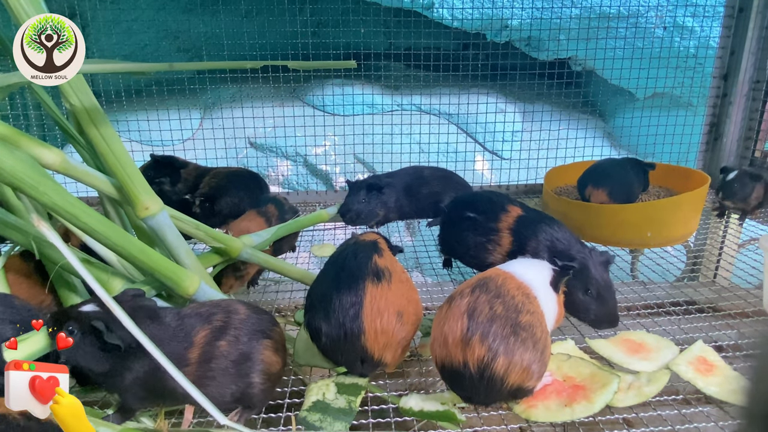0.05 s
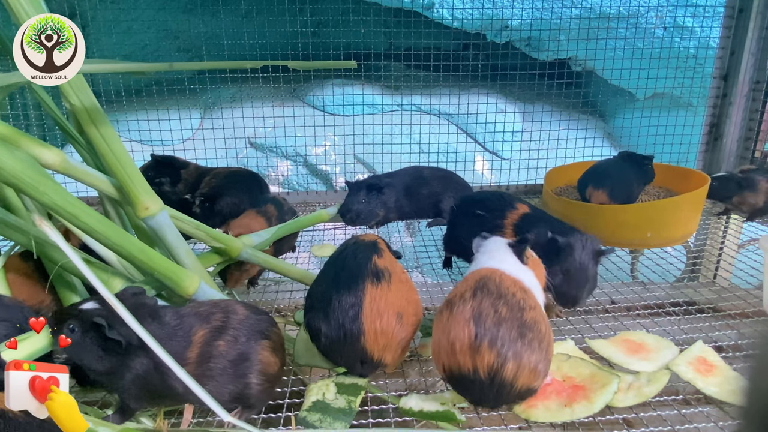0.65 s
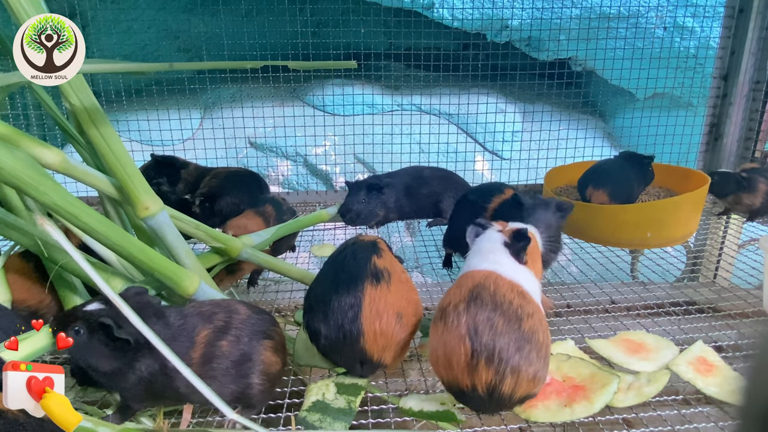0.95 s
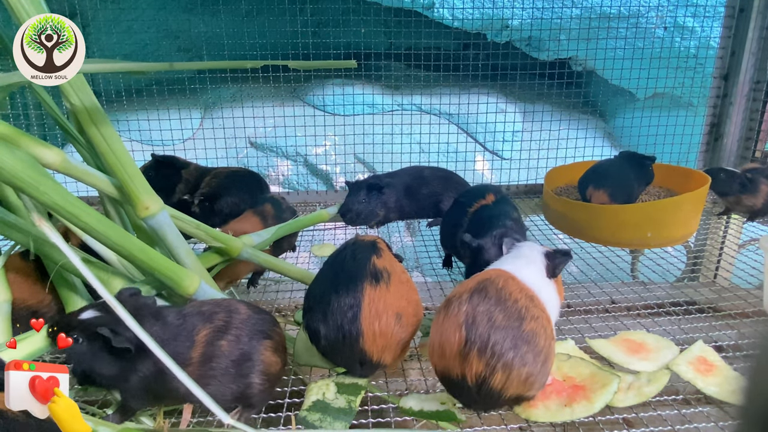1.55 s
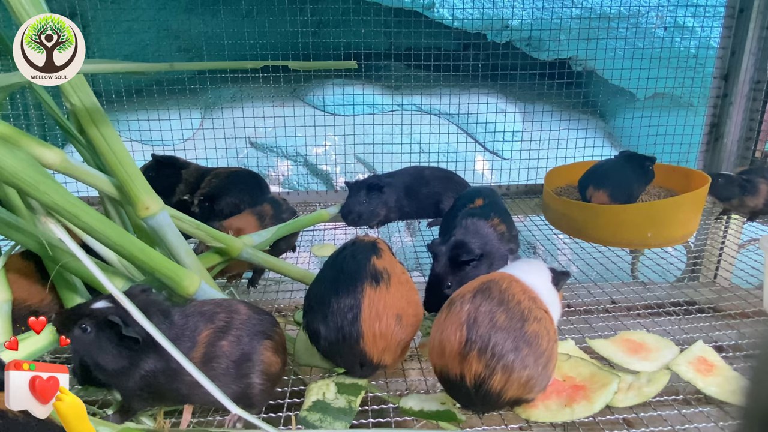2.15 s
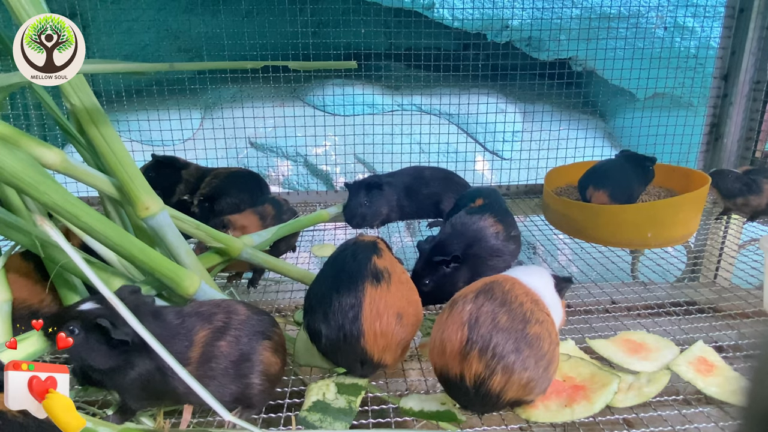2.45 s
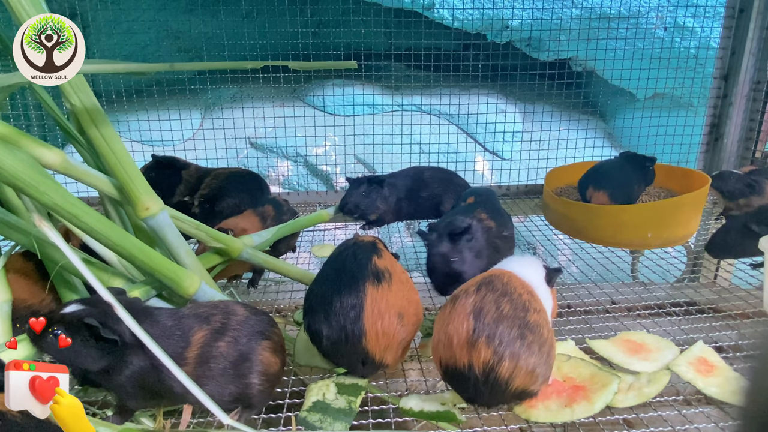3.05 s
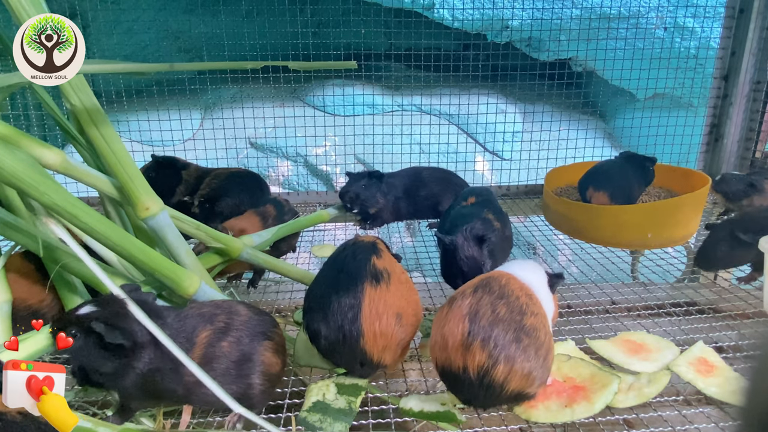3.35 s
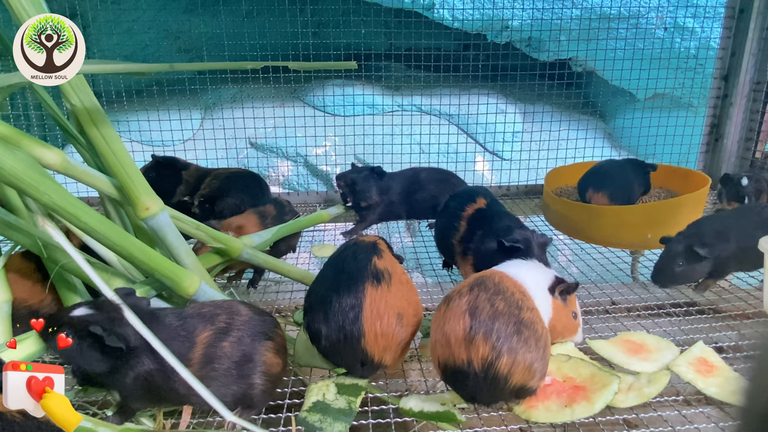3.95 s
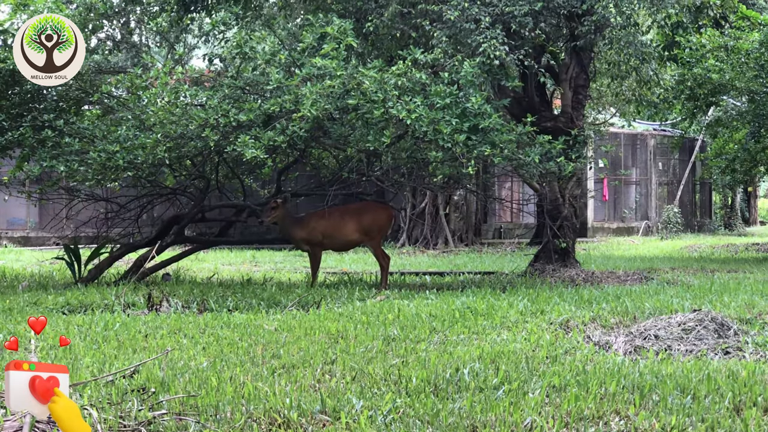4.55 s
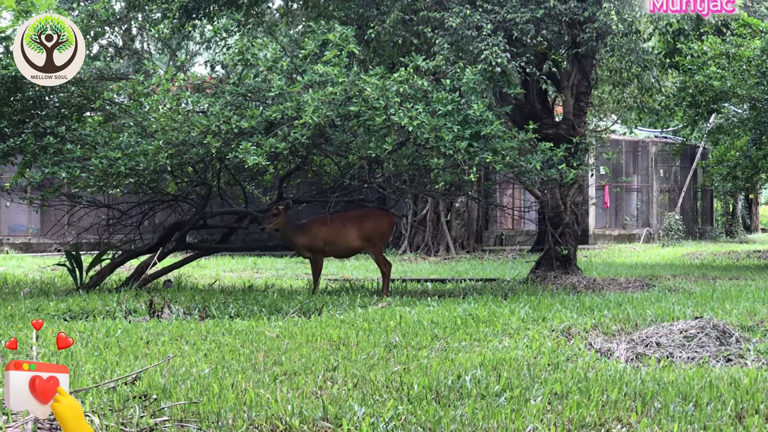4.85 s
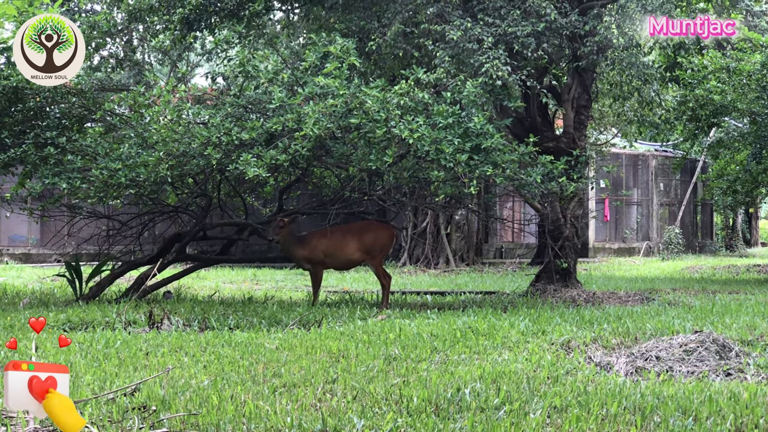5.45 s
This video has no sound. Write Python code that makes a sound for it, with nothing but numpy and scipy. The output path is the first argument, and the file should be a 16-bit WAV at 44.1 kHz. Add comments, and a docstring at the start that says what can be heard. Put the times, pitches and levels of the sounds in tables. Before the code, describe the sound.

Overlapping, rising guinea pig squeals fill a cage, followed by a faint open-air hiss with dry ticks and one brush of foliage.

```python
"""Guinea pigs beg for food in a wire cage, close by: overlapping calls start as a low whine near 500 Hz
and whip up into a whistle as the vocal folds tighten. Air rasps in their throats; feet scuffle in leaves.
Then the scene changes to an open lawn: a soft hiss, the crackle of dry blades and snapping stalks,
and one brushing rustle of foliage."""
import sys
import numpy as np
from scipy import signal
from scipy.fft import rfft, irfft
from scipy.io import wavfile
from scipy.ndimage import uniform_filter1d, map_coordinates

SR = 44100
rng = np.random.default_rng(int(sys.argv[2]) if len(sys.argv) > 2 else 0)


def wrap_up_sound(samples):
    """Save the sound to the file named by the first command line argument, as 16-bit audio."""
    columns = np.atleast_2d(samples).T
    # keep every value between -1 and 1, then stretch to whole-number steps
    tamed = np.clip(columns, -1, 1)
    steps = np.round(tamed * 32767).astype(np.int16)
    wavfile.write(sys.argv[1], SR, steps)


N = 251370
TIME = np.arange(N) / SR
LAWN_START_S, TOP_HZ = 4.335, 15750


def undb(db):
    """Decibels to gain."""
    return 10 ** (np.asarray(db) / 20)


def colour_db(spectrum, hz):
    """Level of a spectrum of (Hz, dB) points, read on a log-frequency axis."""
    points_hz, db = np.transpose(spectrum)
    return np.interp(np.log(np.maximum(hz, 1)), np.log(points_hz), db)


def shape(x, spectrum):
    """Colours a sound; rms 1."""
    y = irfft(rfft(x) * undb(colour_db(spectrum, np.fft.rfftfreq(N, 1 / SR))), N)
    return y / y.std()


def noise(spectrum):
    """Coloured noise; rms 1."""
    return shape(rng.standard_normal(N), spectrum)


def walk(rate_hz, size):
    """Smooth random drift, spread near 1."""
    steps = np.arange(size) * rate_hz / SR
    return map_coordinates(rng.standard_normal(size // 10 + 2), [steps], order=2, mode="wrap")


def swells(events):
    """Gain of bursts that rise and fall exponentially."""
    return sum(undb(db) * np.exp(-np.maximum((peak_s - TIME) / rise_s, (TIME - peak_s) / fall_s))
               for peak_s, db, rise_s, fall_s in events)


def smooth_curve(t, times, values):
    """Cubic curve through the points, without overshoot."""
    slope = np.diff(values) / np.diff(times)
    before, after = slope[:-1], slope[1:]
    inner = 2 * np.maximum(before * after, 0) / np.where(before * after > 0, before + after, 1)
    tangent = np.r_[slope[0], inner, slope[-1]]
    i = np.clip(np.searchsorted(times, t) - 1, 0, len(times) - 2)
    u = (t - times[i]) / (times[i + 1] - times[i])
    bend = (tangent[i] - slope[i]) * (1 - u) - (tangent[i + 1] - slope[i]) * u
    return values[i] + (t - times[i]) * (slope[i] + (1 - u) * bend)


# Calls that swing from a whine to an end pitch. Each row: start and length in seconds, whine and end
# pitch in Hz, swing midpoint and swing time in seconds, sharp onset as a share of pitch, attack in
# seconds, source level in dB at whine, mid swing and end, second and upper harmonics in dB relative to
# that level in the whine, the same two at the end.
WHEEK_CALLS = [(0.0, 0.14, 530, 3080, 0.077, 0.024, 0.079, 0.00067, -44.5, -45, -45, -2.5, -12, -4, 2),
               (0.118, 0.2, 480.3, 1990, 0.11, 0.045, 0.41, 0.011, -39.5, -36.5, -46.5, -7.5, -12, -18, -15),
               (0.243, 0.19, 502.3, 3620, 0.1, 0.03, 0.29, 0.01, -42.5, -41, -46, -2, -9, -4.5, -10),
               (0.432, 0.16, 558.4, 448.3, 0.081, 0.0044, 0.07, 0.02, -48, -45.5, -57, -2, -6, -5, 7),
               (0.435, 0.129, 466.4, 1350, 0.061, 0.0256, 0.3, 0.0012, -41, -42.5, -41.5, 0.5, -7.5, -20, -26),
               (0.562, 0.15, 546.6, 1495, 0.033, 0.027, 0.116, 0.0069, -42, -37.5, -38.5, 5.5, -8, -13, -22),
               (0.597, 0.16, 493.3, 3190, 0.099, 0.025, 0.24, 0.0052, -44.5, -39, -34.5, 0.5, 0, -3.5, -14.5),
               (0.672, 0.16, 478.2, 2780, 0.099, 0.041, 0.03, 0.0056, -51.5, -43.5, -35, -4, 14, -26, -31),
               (0.883, 0.14, 488, 2515, 0.11, 0.039, 0.27, 0.04, -50, -34, -57, 4, 1.5, -17, 0),
               (0.985, 0.12, 575, 3335, 0.014, 0.048, 0.018, 0.018, -38.5, -44.5, -36, 16, -4, -13, -13),
               (0.994, 0.14, 450.6, 957, 0.1, 0.041, 0.018, 0.03, -40.5, -38.5, -36, 2, 3, -3.5, -21),
               (1.521, 0.18, 531, 3020, 0.1, 0.023, 0.25, 0.0098, -47.5, -37.5, -43.5, -0.5, -4, -1, -3),
               (1.624, 0.17, 382, 2540, 0.097, 0.051, 0.21, 0.0078, -50, -52, -35, -5, -2, -2, -7),
               (1.844, 0.18, 527, 3003, 0.098, 0.023, 0.31, 0.0028, -45.5, -36, -38.5, 0, -1.5, -3.5, -7.5),
               (2.082, 0.084, 553, 716, 0.063, 0.031, 0.099, 0.0086, -36.5, -39.5, -51, -6.5, -17.5, 1, -6),
               (2.154, 0.093, 468, 1590, 0.07, 0.034, 0.16, 0.004, -54.5, -35.5, -38.5, 2, 8, -9, -15),
               (2.302, 0.2, 342, 2815, 0.074, 0.11, 0.36, 0.004, -48.5, -56, -40.5, -9, -16, -2, -7),
               (2.468, 0.14, 471, 1640, 0.099, 0.027, 0.33, 0.0026, -53, -35.5, -51, 8, 1, -29.5, -8),
               (2.607, 0.16, 541, 1213, 0.086, 0.035, 0.2, 0.017, -35, -51, -42, -3.5, -12.5, 7, -9),
               (2.906, 0.11, 992, 1020, 0.017, 0.026, 0.0056, 0.02, -41, -54, -65, -13, -12, -5, -11.5),
               (2.983, 0.17, 480, 3650, 0.096, 0.047, 0.18, 0.028, -32, -31.5, -35.5, -3.5, -11, -24, -28),
               (3.05, 0.13, 465, 590, 0.06, 0.02, 0.33, 0.033, -48.5, -39, -47, -14, 10, 2, 10),
               (3.144, 0.096, 816.5, 1185, 0.073, 0.0095, 0.28, 0.011, -39.5, -36.5, -59, 4, 3.5, 27.5, 4.5),
               (3.295, 0.21, 484, 3700, 0.106, 0.045, 0.2, 0.016, -46.5, -31, -34.5, 3, -5, -16.5, -17.5),
               (3.364, 0.174, 516, 2549, 0.094, 0.043, 0.33, 0.007, -26, -33.5, -26, -9, -18.5, -4.5, -20.5),
               (3.439, 0.11, 524, 1165, 0.0011, 0.1, 0.064, 0.0012, -45, -36.5, -72.5, 12.5, 8, -1, -2.5),
               (3.616, 0.096, 505.2, 522.4, 0.059, 0.023, 0.0, 0.034, -46.5, -44, -28.5, 3, -4.5, -8, -10),
               (3.772, 0.085, 479.4, 1562, 0.06, 0.026, 0.012, 0.038, -46, -39.5, -31, 15, -3, -3.5, -19),
               (3.982, 0.18, 453.6, 3800, 0.11, 0.038, 0.13, 0.0013, -51, -33.5, -31.5, 8.5, 5, -14, -10),
               (4.076, 0.25, 453, 2680, 0.087, 0.09, 0.47, 0.023, -31, -47.5, -31, 0, -4.5, -9.5, -22),
               (4.161, 0.07, 653, 979, 0.078, 0.054, 0.0, 0.0033, -59, -53, -36.5, 29.5, 14.5, -4, 7),
               (4.254, 0.07, 496.6, 580, 0.07, 0.01, 0.31, 0.013, -45, -39.5, -35, -4.5, 2.5, -9, 12)]


def wheeks(settle_s=0.012, release_s=0.0098, quaver_hz=38.2, quaver_share=0.012, quaver_db=3.5,
           waver_hz=140, waver_share=0.016, waver_db=1.6):
    """Yields each call: fold tension follows an S-curve and sets pitch, level, overtones and quaver."""
    for call in WHEEK_CALLS:
        start_s, length_s, whine_hz, end_hz, middle_s, swing_s, sharp_share, attack_s = call[:8]
        levels_db, whine_overtones_db, end_overtones_db = call[8:11], call[11:13], call[13:]
        t = TIME[int(start_s * SR):int((start_s + length_s) * SR)]
        age = t - t[0]
        pull = np.tanh((age - middle_s) / swing_s)
        tension = (pull - pull[0]) / (pull[-1] - pull[0])
        quaver = tension * np.sin(2 * np.pi * quaver_hz * age + walk(quaver_hz, len(t)))
        hz = whine_hz * (end_hz / whine_hz) ** tension
        hz *= 1 + sharp_share * np.exp(-age / settle_s) + quaver_share * quaver
        db = np.interp(tension, [0, .5, 1], levels_db) + quaver_db * quaver
        thin_second_db, thin_upper_db = thinning(hz)
        unsteady = 4 * tension * (1 - tension)  # greatest in mid swing
        hz *= 1 + waver_share * unsteady * walk(waver_hz, len(t))
        db += waver_db * unsteady * walk(waver_hz, len(t))
        flare_db, shine_db = flares(t, hz)
        second_db, upper_db = (db + np.interp(tension, [0, 1], ends)
                               for ends in zip(whine_overtones_db, end_overtones_db))
        second_db += thin_second_db + shine_db / 2
        upper_db += thin_upper_db + shine_db
        gate = np.minimum(age / attack_s, 1) * np.minimum((t[-1] - t) / release_s, 1)
        yield voice(t, hz, (db + flare_db, second_db, upper_db), gate)


# Throat and mouth resonances. Each row: frequency in Hz, gain in dB.
THROAT_RESPONSE = [(2400, 1), (3300, -10.5), (3700, -15.5), (4100, -23.5), (5400, -20), (7000, -14.5),
                   (8300, -20.5), (10500, -22), (15000, -34.5)]


def voice(t, hz, levels_db, gate, jitter=0.008, rattle=0.011, flutter_db=1.7, hoarse=0.045,
          whistle_hz=1500, rolloff_db_per_octave=10.5):
    """The folds' harmonics slide through fixed throat resonances. Returns tone and rasp envelope."""
    slack = 1 / (1 + (hz / whistle_hz) ** 2)  # slack folds beat unevenly, tight ones whistle
    hz = hz * (1 + np.sqrt(slack) * jitter * walk(130, len(t)) + slack * rattle * walk(900, len(t)))
    phase = 2 * np.pi * np.cumsum(hz) / SR
    first_db, second_db, upper_db = levels_db
    uppers_db = [upper_db - rolloff_db_per_octave * np.log2(k / 3) for k in range(3, 17)]
    tone, power = 0, 0
    for k, db in enumerate([first_db, second_db] + uppers_db, 1):
        harmonic_db = db + colour_db(THROAT_RESPONSE, k * hz) + flutter_db * walk(150, len(t))
        gain = gate * undb(harmonic_db) * (k * hz < TOP_HZ)
        roughness = 1 + min(hoarse * k ** 1.5, .7) * walk(1100, len(t))
        tone += gain * np.sin(k * phase) * roughness
        power += gain ** 2
    start = round(t[0] * SR)
    return np.pad([tone, np.sqrt(power) * slack], ((0, 0), (start, N - start - len(t))))


# Air rushing through the throat. Each row: frequency in Hz, level in dB.
RASP_SPECTRUM = [(180, -12), (320, 2), (600, 15), (2900, 10.5), (4000, -35), (7200, -37), (15000, -24.5)]
# Raspy grunts. Each row: peak in seconds, added rasp in dB re the usual rasp, rise and fall in seconds.
GRUNT_SWELLS = [(.47, 6, .01, 0.035), (1.35, -9, .02, 0.028), (2.68, 14.5, 0.013, 0.077),
                (3.06, 12, .012, 0.023), (3.15, 8, .02, 0.017), (3.42, 3.5, 0.035, 0.014),
                (3.69, -1, .012, 0.029), (3.83, 3, .02, 0.013)]


def rasp(envelope, level_db=-24.5):
    """Throat air follows the voices and swells where they break into a grunt."""
    return undb(level_db) * (1 + swells(GRUNT_SWELLS)) * envelope * noise(RASP_SPECTRUM)


def thinning(hz, second_db=-3, upper_db=-9, fast_octaves_per_s=26):
    """Second and upper harmonics weaken in a fast upward slide; both changes in dB."""
    octaves_per_s = uniform_filter1d(np.gradient(np.log2(hz)) * SR, size=700)
    return np.outer([second_db, upper_db], np.clip(octaves_per_s / fast_octaves_per_s, 0, 1))


# Whistle flares. Each row: centre and half length in seconds, gain in dB of the fundamental and of the
# upper harmonics at full whistle.
WHISTLE_FLARES = [(0.109, .005, 13.5, 10), (0.123, 0.0087, 15, 1), (0.389, 0.0064, 20.5, 22),
                  (.406, 0.01, 11, 12), (0.737, 0.011, 12, -7), (1.068, 0.017, 9.5, 4),
                  (1.668, 0.022, 16, -10), (1.973, 0.0063, 9, 11), (1.995, 0.011, 11, -24),
                  (3.149, 0.032, -5, 33), (3.467, 0.023, -5.5, 22.5), (4.131, 0.0041, 19.5, 12.5),
                  (4.306, 0.0081, 5.5, 0)]


def flares(t, hz, onset_hz=1940, full_hz=2650):
    """A voice high enough to whistle flares for an instant; fundamental and upper gains in dB."""
    centre_s, half_s, *gains_db = np.transpose(WHISTLE_FLARES)
    bumps = np.exp(-((t - centre_s[:, None]) / half_s[:, None]) ** 2)
    return np.array(gains_db) @ bumps * np.interp(hz, [onset_hz, full_hz], [0, 1])


def crackle(spectrum, clicks_per_s, spread_db):
    """Leaves rub: dense tiny clicks, a few much larger than the rest; rms 1."""
    sizes = undb(spread_db * np.minimum(rng.exponential(size=N), 4))
    clicks = rng.standard_normal(N) * sizes * (rng.random(N) < clicks_per_s / SR)
    return shape(clicks, spectrum)


# Leaves in the cage. Each row: frequency in Hz, level in dB.
SCUFFLE_SPECTRUM = [(600, -5), (3400, 6), (4400, 0.5), (7300, 1.5), (10000, -10), (15000, -21.5)]
# Pushes of the feet. Each row: peak in seconds, level in dB, rise and fall in seconds.
SCUFFLE_SWELLS = [(.73, -65, 0.069, 0.083), (1.11, -58.5, 0.12, 0.061), (1.46, -49, 0.034, 0.027),
                  (1.635, -46, 0.0067, 0.056), (1.89, -56, 0.039, 0.019), (2.89, -60.5, 0.083, 0.029),
                  (3.6, -63.5, 0.0034, 0.0079)]


def scuffle(nibble_db=-74):
    """Feet push through leaves over faint, steady nibbling."""
    envelope = undb(nibble_db) + swells(SCUFFLE_SWELLS)
    return envelope * crackle(SCUFFLE_SPECTRUM, clicks_per_s=6000, spread_db=3)


# Drawn-out squeals, one curve each. Each row of a curve: time in seconds, pitch in Hz, source level in dB
# of the fundamental, the second harmonic and the upper harmonics.
SQUEAL_CURVES = [
    [(1.164, 660, -43.5, -40, -57.5), (1.197, 511, -36.5, -42.5, -47), (1.275, 793.5, -45, -43.5, -58.5),
     (1.297, 1250, -26.5, -46, -44), (1.341, 828, -43, -43, -35.5), (1.391, 826, -44, -46.5, -38.5),
     (1.418, 950, -34.5, -60.5, -42.5), (1.437, 1377, -46, -71, -63.5)],
    [(1.248, 494, -46, -60, -47), (1.274, 474, -43, -39, -55), (1.297, 867, -40, -57, -52),
     (1.323, 1261, -43, -37, -37), (1.338, 1956, -27, -62, -42), (1.35, 2200, -21, -19, -24),
     (1.362, 2346, -31.5, -19.5, -36), (1.38, 2990, -10.5, -8, -20), (1.399, 3203, -9, -4.5, -23.5),
     (1.422, 3327, -11, -2.5, -24), (1.453, 3488, -11, -19, -39), (1.468, 3490, -16.5, -43, -38)],
    [(1.71, 566.6, -38.5, -55, -75), (1.733, 536.4, -40.5, -40.5, -49), (1.817, 1315, -36, -45, -48),
     (1.845, 2136, -38.5, -42, -58), (1.897, 1635, -38, -43, -41), (1.94, 2170, -36, -42, -55)],
    [(2.028, 434, -49, -68, -65), (2.127, 605.5, -55, -44.5, -54), (2.175, 1118, -32, -39, -51.5),
     (2.252, 1726, -40, -45, -57), (2.272, 2320, -32.5, -33, -45), (2.318, 2806, -25.5, -48, -41.5),
     (2.35, 3560, -29, -42, -43), (2.371, 3515, -9, -55, -28), (2.39, 3483, -21, -30, -31),
     (2.417, 3567, -9, -17.5, -39), (2.43, 3560, -51, -27, -43)],
    [(2.663, 588, -71, -41, -52), (2.682, 453.4, -44, -38, -47.5), (2.705, 688, -55, -39.5, -53),
     (2.76, 952, -46, -42, -43.5), (2.781, 1084, -45, -34, -49), (2.8, 960, -37.5, -33, -40),
     (2.816, 1055, -43.5, -34, -44), (2.838, 991, -38.5, -33, -35), (2.876, 1306, -80, -34, -66)],
    [(3.668, 693.4, -30, -32.5, -49), (3.686, 516, -33.5, -47, -54), (3.702, 520, -36.5, -46.5, -48),
     (3.752, 568.4, -32, -37, -46), (3.78, 707, -46.5, -36, -49), (3.798, 972, -36, -48, -57),
     (3.886, 2280, -34, -36.5, -61), (3.903, 2267, -26.5, -48, -55), (3.92, 2720, -33, -37, -45)],
]


def squeals(edge_s=0.0024):
    """Yields each long call, its pitch and strength wandering along a curve."""
    for curve in SQUEAL_CURVES:
        times, pitch_hz, *levels_db = np.transpose(curve)
        t = TIME[int(times[0] * SR):int(times[-1] * SR)]
        hz = np.exp(smooth_curve(t, times, np.log(pitch_hz)))
        gate = np.clip(np.minimum(t - t[0], t[-1] - t) / edge_s, 0, 1)
        yield voice(t, hz, [np.interp(t, times, db) for db in levels_db], gate)


def herd(low_cut_hz=330):
    """All calls with their rasp; nothing sounds below the low cut."""
    tone, rasp_envelope = sum(wheeks()) + sum(squeals())
    highpass = signal.butter(2, low_cut_hz, "high", fs=SR, output="sos")
    return signal.sosfilt(highpass, tone + rasp(rasp_envelope))


def enclosure(x, t60_s=0.26, tail_db=-21, bounce_db=-17, bounce_s=0.0028):
    """A bounce off a tarpaulin makes the glides waver; the enclosure adds a short, weak tail."""
    t = TIME[:SR // 2]
    response = rng.standard_normal(len(t)) * np.exp(-np.log(1000) * t / t60_s) * (t > bounce_s)
    tail = signal.fftconvolve(x, response / np.linalg.norm(response))[:N]
    bounce = np.roll(x, int(bounce_s * SR))
    return x + undb(bounce_db) * bounce + undb(tail_db) * tail


# Still air around the cage. Each row: frequency in Hz, level in dB.
CAGE_AIR_SPECTRUM = [(30, 0.5), (65, -7.5), (110, -19), (300, -7.5), (2500, -20.5), (5000, -35.5),
                     (15000, -28.5)]


def cage(air_db=-69, fade_out_s=0.027):
    """Calls and scuffling in the enclosure over still air, until the lawn starts."""
    sound = enclosure(herd() + scuffle()) + undb(air_db) * noise(CAGE_AIR_SPECTRUM)
    return sound * np.clip((LAWN_START_S - TIME) / fade_out_s, 0, 1)


# Air over the lawn. Each row: frequency in Hz, level in dB.
LAWN_AIR_SPECTRUM = [(15, -28), (25, 17), (848, -11.5), (1340, -2), (2230, -30), (2850, -4), (8130, -21),
                     (15500, -40)]


def lawn_air(level_db=-62):
    """A soft hiss of air; its level drifts by about 1 dB."""
    return undb(level_db + walk(16, N)) * noise(LAWN_AIR_SPECTRUM)


def ticks(events, decay_s, width_octaves):
    """Dry fibres break, each a burst of noise around its own pitch."""
    out, t = np.zeros(2 * N), TIME[:SR // 40]
    for start_s, peak_db, hz in events:
        edges_hz = np.minimum(hz * 2 ** (np.array([-1, 1]) * width_octaves / 2), TOP_HZ)
        crack = rng.standard_normal(len(t)) * np.exp(-t / decay_s)
        burst = signal.lfilter(*signal.butter(2, edges_hz, "band", fs=SR), crack)
        start = int(start_s * SR)
        out[start:start + len(t)] += undb(peak_db) * burst / np.abs(burst).max()
    return out[:N]


def blades(count=170, pitch_hz=3700, spread_octaves=0.3, spread_db=5):
    """Dry blades and leaves tick at random; rms 1 during the lawn scene."""
    when, size, pitch = rng.random((count, 3)).T
    start_s = LAWN_START_S + when * (TIME[-1] - LAWN_START_S)
    db = -spread_db * np.log(size + 0.019)
    hz = pitch_hz * 2 ** (spread_octaves * np.arcsin(2 * pitch - 1))
    ticking = ticks(zip(start_s, db, hz), decay_s=0.0015, width_octaves=1.1)
    return ticking / ticking[TIME > LAWN_START_S].std()


# Rubbing foliage. Each row: frequency in Hz, level in dB.
FOLIAGE_SPECTRUM = [(150, -5), (400, -1), (1150, -1), (2000, -2), (3100, 1.5), (5000, -2.5), (9000, -6.5),
                    (15000, -28.5)]
# Brushes against foliage. Each row: peak in seconds, relative level in dB, rise and fall in seconds.
BRUSH_SWELLS = [(4.55, -62, 0.074, 1), (4.876, -53.5, 0.0084, 0.0067), (5.16, -36, 0.027, 0.035),
                (5.3, -62, 0.1, 0.23)]


def foliage(rub_db=4, thud_db=-13):
    """Brushed leaves rub and tick; only a hard brush moves whole branches and adds a low thud."""
    push = swells(BRUSH_SWELLS)
    leaves = undb(rub_db) * crackle(FOLIAGE_SPECTRUM, clicks_per_s=8100, spread_db=5) + blades()
    thud = undb(thud_db) * noise([(90, -18), (170, 21), (600, -10), (2000, -55)])
    return push * leaves + push ** 2 / push.max() * thud


# Dry stalks. Each row: start in seconds, relative peak level in dB, pitch in Hz.
STALK_SNAPS = [(4.538, -42.5, 3920), (4.676, -40.5, 4210), (4.703, -34, 3460), (4.734, -39.5, 5000),
               (4.865, -40, 3360), (4.877, -30, 3480), (4.879, -42.5, 1050), (4.915, -43, 3700),
               (4.933, -39, 2830), (5.027, -35, 3460), (5.105, -42, 3350), (5.165, -27.5, 2900),
               (5.264, -36.5, 5860), (5.461, -40.5, 3200), (5.505, -52.5, 3780), (5.589, -46, 3000)]


def stalks(gain_db=8):
    """Larger stalks break with a wide, dry crack."""
    return undb(gain_db) * ticks(STALK_SNAPS, decay_s=0.0017, width_octaves=0.93)


def lawn(fade_in_s=0.17, sizzle_db=-67):
    """Foliage, air and stalks fade in; a thin treble sizzle starts at once."""
    fade_in = np.clip((TIME - LAWN_START_S) / fade_in_s, 0, 1)
    rustle = foliage() + lawn_air()
    sizzle = undb(sizzle_db) * noise([(2000, -25), (8800, -2), (10500, -18.5)])
    return (rustle + stalks()) * fade_in + sizzle * (TIME > LAWN_START_S)


def scene():
    """Cage, then lawn, both centred; only a faint treble hiss has width."""
    mid = cage() + lawn()
    side = undb(-75) * noise([(3000, -20), (7500, 0), (15000, -14)])
    return np.array([mid + side, mid - side])


def record(dry):
    """A steep low-pass cuts the treble above TOP_HZ."""
    return signal.sosfilt(signal.ellip(10, .1, 80, TOP_HZ, fs=SR, output="sos"), dry)


dry = scene()
out = record(dry)
wrap_up_sound(out)
```